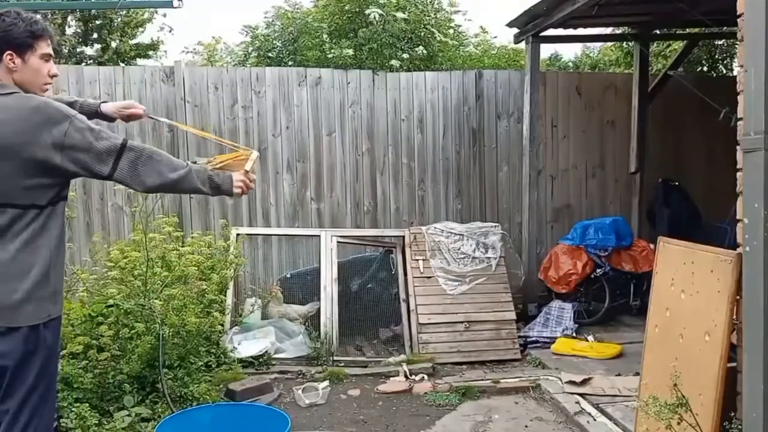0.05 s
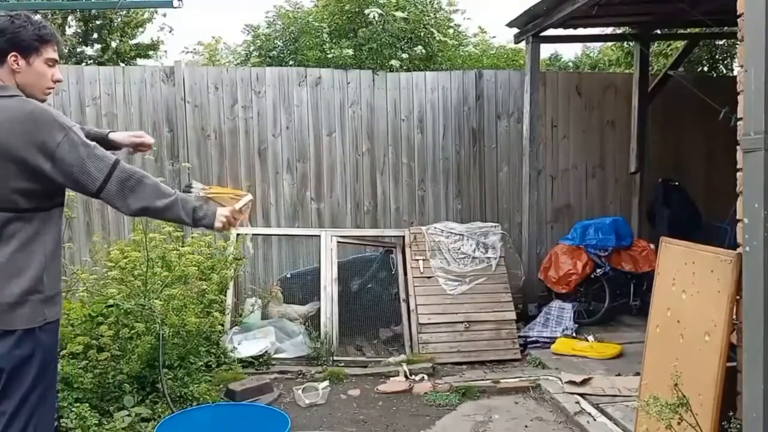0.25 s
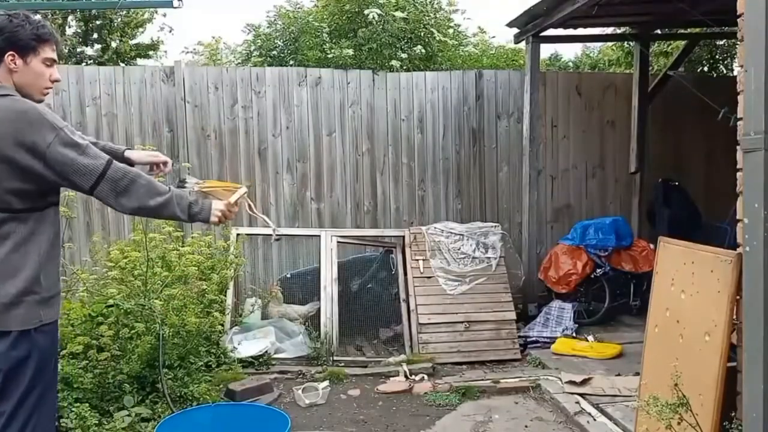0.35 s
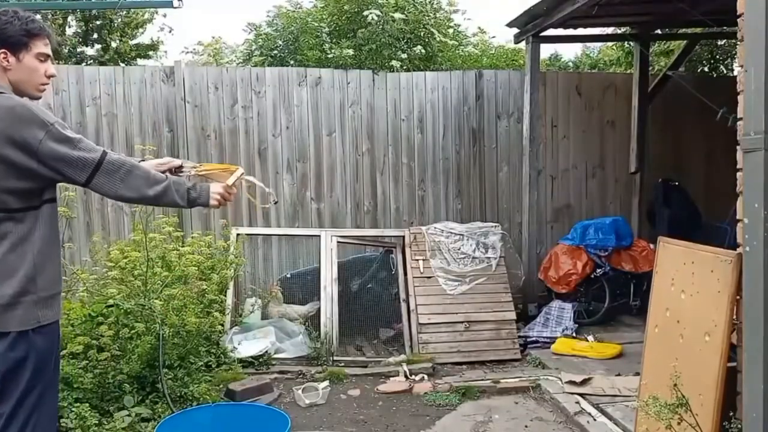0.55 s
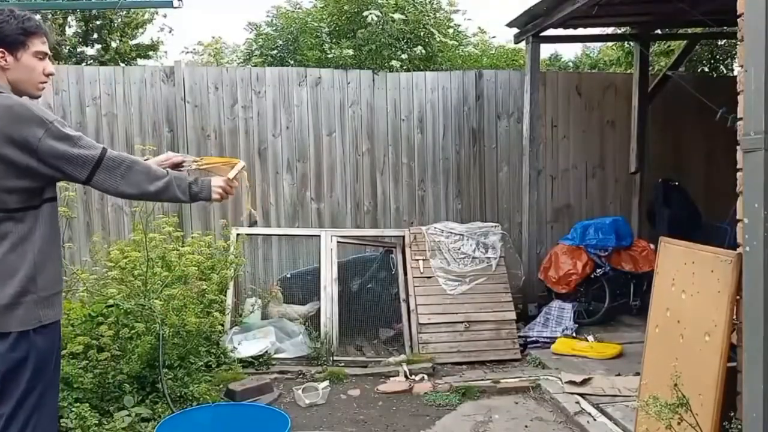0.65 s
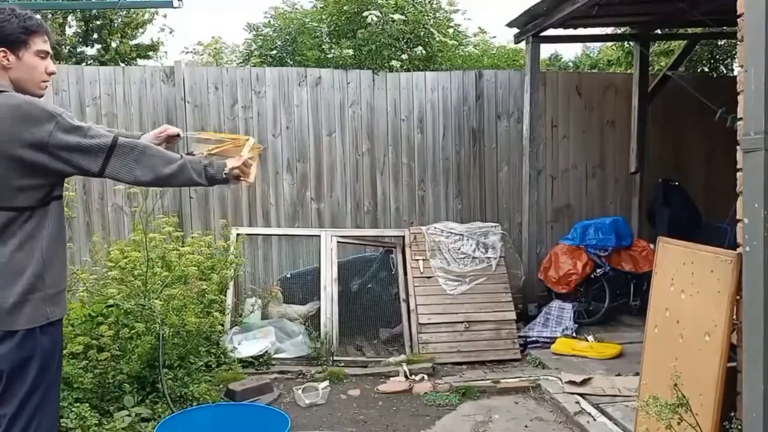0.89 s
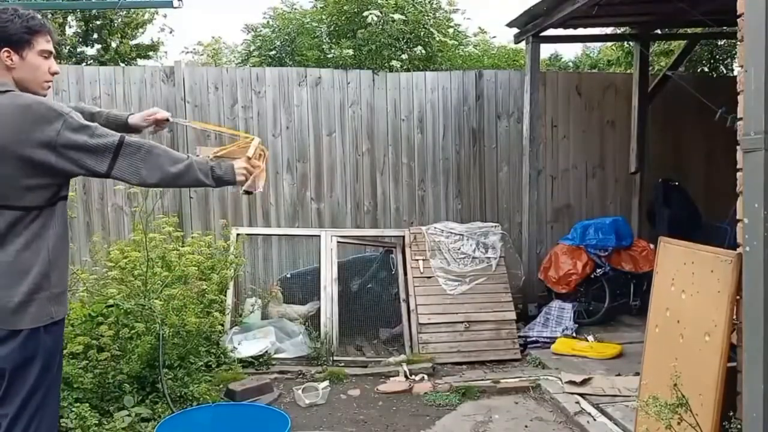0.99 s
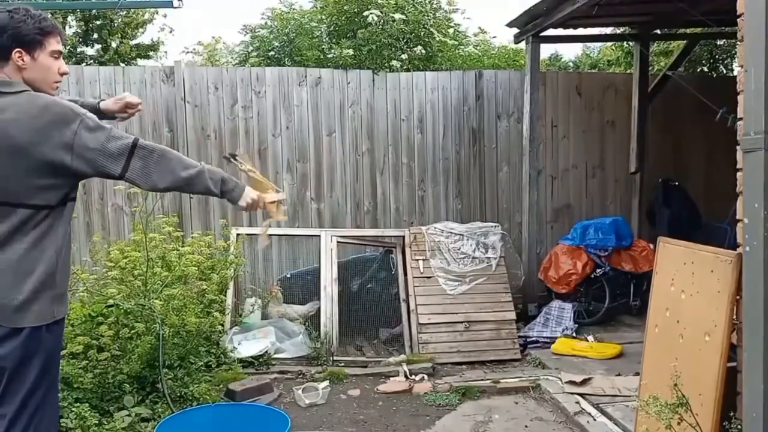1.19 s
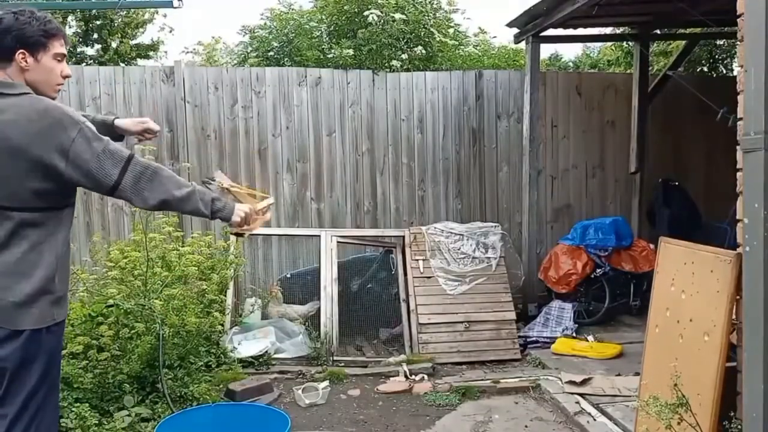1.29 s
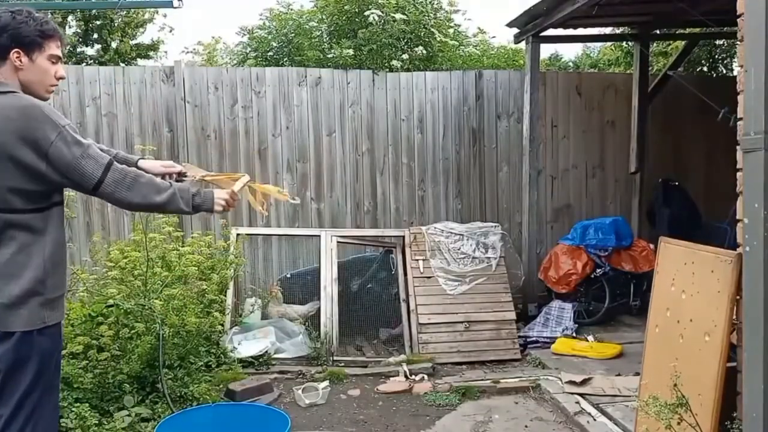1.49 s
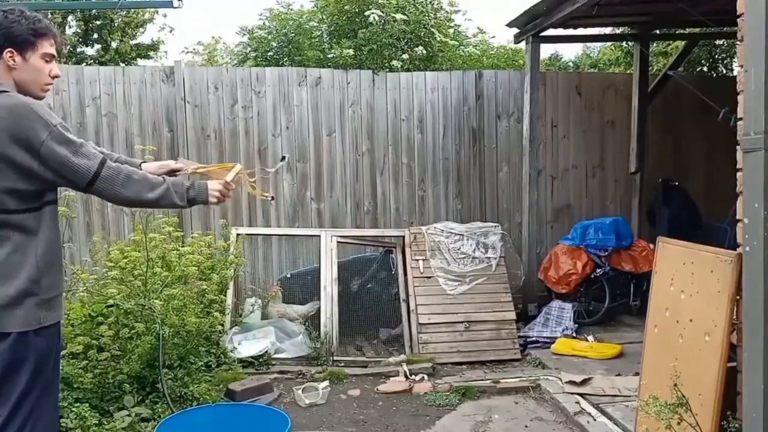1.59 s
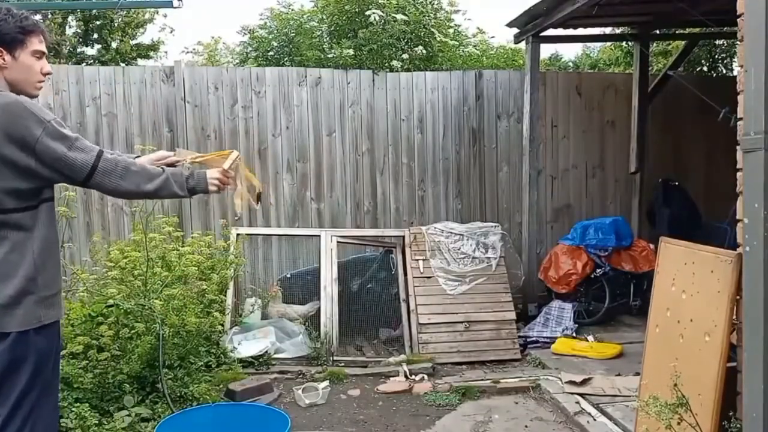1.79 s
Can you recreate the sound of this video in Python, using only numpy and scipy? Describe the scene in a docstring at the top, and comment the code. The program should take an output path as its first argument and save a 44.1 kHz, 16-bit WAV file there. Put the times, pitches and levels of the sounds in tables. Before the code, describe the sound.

A slingshot fires twice in a fenced yard, sharp snaps followed by a thwack and a clang

```python
"""A wooden slingshot is fired twice in a fenced back yard: its bands slap and crack as pressure pulses
and noise bursts, rubber and fork ring as decaying modes, and fence and shed return echoes and scatter.
Rubber swishes before each snap, as swelling noise, and loose bands and sleeve rustle. The first shot
thwacks a hollow board and drops; the second clangs on something harder, and two dull thuds follow as
the slack bands flap back. Air and leaves murmur as steady coloured noise that slowly fades."""
import sys
import numpy as np
from scipy import signal
from scipy.io import wavfile
from scipy.ndimage import uniform_filter1d

SR = 44100
rng = np.random.default_rng(int(sys.argv[2]) if len(sys.argv) > 2 else 0)


def store_pcm(level_fs):
    """Save levels as 16-bit WAV."""
    pcm = np.round(np.clip(level_fs, -1, 1) * 32767).astype(np.int16)
    wavfile.write(sys.argv[1], SR, np.atleast_2d(pcm).T)


N = 81585
TIME = np.arange(N) / SR

# edges of the noise bands: (frequency [Hz])
BAND_EDGES_HZ = np.r_[np.geomspace(22, 4400, 16), 5200, 6300, 7700, 8600, 11000, 14000, 17000]
# likeness of the two ears: (frequency [Hz], correlation [-1 to 1])
EAR_LIKENESS = [(60, 0.92), (150, 1), (300, 0.86), (550, 0.3), (1000, -0.15), (2200, -0.25), (5000, 0)]
# reverberation of the yard before scaling: (frequency [Hz], t60 [s])
YARD_T60 = [(60, 0.59), (250, 0.51), (800, 0.44), (2500, 0.57), (7000, 0.54), (15000, 0.37)]
SCATTER_GRAIN_DB, SCATTER_GRAIN_HZ = 2.2, 160   # reflections come in clumps
RING_WAVER_DB, RING_WAVER_HZ = 1.4, 35   # reflections make every ring waver
LEAD_S = 0.00019   # the slingshot is to the left

# spectrum of air and leaves: (frequency [Hz], density [dB per Hz])
AIR_COLOUR = [(25, 0.5), (55, -11), (115, 9), (180, 1), (400, -2.5), (800, -4.5), (1200, 3.5), (2400, -6),
              (4500, -18.5), (5700, -17.5), (7000, -15), (8200, -61.5), (9800, -54), (15000, -56)]
AIR_DB, AIR_FADE_DB_PER_S = -49, -2

# dull bumps of air and handling: (time [s], level [dB], width [s])
BUMPS = [(.12, -44, 0.052), (.54, -46.5, 0.1), (.61, -52, .022), (.72, -60, 0.035), (.94, -55.5, 0.035)]
# spectrum of the bumps: (frequency [Hz], density [dB per Hz])
BUMP_COLOUR = [(30, -41), (70, -5.5), (125, 13), (190, -33), (500, -9), (2000, -61)]
# small ticks, the second and third being sharp echoes of the first snap: (time [s], level [dB])
TICKS = [(0.1214, -32.5), (0.236, -26), (0.2564, -23), (1.183, -31), (1.219, -27), (1.476, -31.5)]
# rubber slides from the fingers and rushes forward: (time [s], level [dB], width [s])
SWISHES = [(.127, -69, 0.0056), (.162, -40, .018), (1.19, -43.5, 0.0046), (1.222, -33, 0.01),
           (1.264, -37, 0.011)]
# spectrum of the swishes: (frequency [Hz], density [dB per Hz])
SWISH_COLOUR = [(150, -13), (370, -3), (900, -2.5), (1600, 0), (2600, 2), (3800, -9), (5700, -11.5),
                (7000, -5), (8200, -16), (10000, -23.5), (15000, -25)]
# loose bands and sleeve rustle: (time [s], level [dB], width [s])
RUSTLES = [(.51, -41.5, 0.037), (.622, -43.5, 0.014), (.668, -37.5, 0.024), (.725, -38.5, 0.011),
           (.845, -47, 0.026), (.93, -48, 0.025), (1.05, -53.5, 0.15), (1.49, -50, 0.038)]
# spectrum of the rustles: (frequency [Hz], density [dB per Hz])
RUSTLE_COLOUR = [(100, -2.5), (400, 5.5), (1200, 5), (2700, 3), (4500, -12), (5700, -11), (7000, -12.5),
                 (8200, -47), (9800, -48), (15000, -50.5)]
FRICTION_GRAIN_DB, FRICTION_GRAIN_HZ = 2.5, 110

# the bands snap: (time [s], slap level [dB], slap width [s], crack level [dB], yard level [dB],
# yard tilt [dB per octave], yard low cut [Hz], twang level [dB], fork level [dB])
SNAPS = [(0.2207, -5, 0.0003, -7, -16, -1.08, 259, -3.5, 1.5),
         (1.284, -2.5, 0.00043, -7.5, -20, -0.33, 50, 0.5, -7)]
CRACK_DECAY_S, CRACK_LOW_HZ, CRACK_DULL_HZ, CRACK_TOP_HZ = 0.0023, 850, 2700, 7700
CRACK_EDGE_DB = -20
SECOND_SLAP_S, SECOND_SLAP_DB = 0.00236, -5   # the pouch follows the bands
# hard echoes of the snap: (delay [s], level [dB], left lead [s])
ECHOES = [(.0085, -9, .00005), (.0182, -9, 0), (0.036, -11, -.0001), (.049, -4, .00005)]
ECHO_CUT_HZ = 1800
# spectrum of the snap scattered by the yard: (frequency [Hz], density [dB per Hz])
SNAP_COLOUR = [(35, -32.5), (70, -3.5), (130, 4.5), (180, -16.5), (300, -3), (520, 4), (1000, -3),
               (2500, -10.5), (4700, -21.5), (5700, -27), (7000, -18.5), (8200, -36), (9800, -47.5),
               (15000, -55)]
SNAP_RISE_S, SNAP_HOLD_S, SNAP_T60_SCALE = 0.0042, 0.056, 0.68
# modes of the slack rubber: (frequency [Hz], level [dB], t60 [s])
TWANG_MODES = [(134, -16, 0.37), (225, -19, 0.33)]
# modes of the wooden fork: (frequency [Hz], level [dB], t60 [s])
FORK_MODES = [(368.7, -22, 0.35), (430.5, -14.5, 0.14), (565, -23.5, .22), (698, -23, 0.17),
              (944, -28.5, .28)]
# the slack bands flap back and twang again: (time [s], level [dB])
FLAPS = [(1.401, 2.5), (1.437, -5.5)]
# modes of the flapping bands: (frequency [Hz], level [dB], t60 [s])
FLAP_MODES = [(222, -18, 0.16), (250, -27, .12), (288, -25, 0.14)]

# a thwack on the hollow board, then two dull thuds as the slack bands flap back, almost without ring:
# (time [s], thump level [dB], thump width [s], scatter level [dB], tilt [dB per octave],
# low cut [Hz], t60 scale [ratio], ring level [dB])
THUMPS = [(0.351, -3, 0.00063, -13.5, 0, 107, 0.64, 1.5), (1.4, -15.5, 0.0008, -20.5, -4.5, 150, 0.46, -29),
          (1.4399, -20.5, 0.00045, -28, -6.5, 190, 0.61, -49)]
# spectrum of the scattered thumps and drops: (frequency [Hz], density [dB per Hz])
KNOCK_COLOUR = [(40, -44), (80, 3), (140, -4.5), (250, -1.5), (450, -1.5), (780, -0.5), (1150, -7),
                (2300, -12.5), (4000, -27), (5700, -35.5), (7000, -30.5), (8200, -46.5), (9800, -52),
                (15000, -67)]
KNOCK_LEAD_S, KNOCK_RISE_S = 0.0054, 0.0069   # the scatter starts ahead of the thump
# modes of the hollow board: (frequency [Hz], level [dB], t60 [s])
BOARD_MODES = [(513, -19, 0.26), (604, -27, 0.42), (744, -14, 0.36), (777, -14, 0.33), (805, -22, .26),
               (829, -16, 0.29), (857, -22, .22), (2290, -22, .08)]
BOARD_DELAY_S = 0.011

# the spent shot drops and bounces: (time [s], ring level [dB], contact cut [Hz], scatter level [dB])
DROPS = [(.6375, -23.5, 1500, -36), (.696, -21.5, 430, -44), (.745, -32, 400, -50)]
# modes of the drop: (frequency [Hz], level [dB], t60 [s])
DROP_MODES = [(255, -17, .2), (377, -7, .14), (440, -7, .06), (502, -8, .11), (571, -10, .12),
              (790, -6, .15), (861, -4, .15), (945, -3, .12), (1050, -10, .13)]
DROP_LOW_HZ = 370

# the hard hit: (time [s], tick level [dB], scatter level [dB], ring level [dB])
CLANGS = [(1.3145, -5, -30, -10), (1.329, -13, -25, -3.5), (1.3535, -17, -32, -6.5)]
# spectrum of the scattered clang: (frequency [Hz], density [dB per Hz])
CLANG_COLOUR = [(200, -18), (700, -35), (1200, 6.5), (2200, 15), (3100, -2.5), (4300, -44), (5700, -32),
                (7000, -40), (8200, -17.5), (9800, -51), (15000, -53)]
# modes of the struck object: (frequency [Hz], level [dB], t60 [s])
CLANG_MODES = [(1171, -14, 0.2), (1507, -25, 0.15), (1720, -20, .16), (1933, -25, .2), (2020, -19.5, 0.24),
               (2055, -16, 0.29), (2200, -23, .24), (2275, -21, 0.18), (2412, -24, .15), (2780, -23, 0.11)]
CLANG_RISE_S, CLANG_T60_SCALE = 0.0033, 0.41
CLANG_LEAD_S, CLANG_TICK_TOP_HZ = 0.00014, 3520


def from_db(db):
    """Amplitude ratio: 20 dB is a factor of ten."""
    return 10 ** (np.asarray(db) / 20)


def at_hz(points, hz):
    """Interpolation on a logarithmic frequency axis."""
    table_hz, values = np.array(points).T
    return np.interp(np.log(hz), np.log(table_hz), values)


def filtered(x, hz, kind, order=2):
    """Butterworth filtering: a maximally flat passband."""
    sos = signal.butter(order, hz, kind, fs=SR, output="sos")
    return signal.sosfilt(sos, x + 1e-18)


def delayed(x, s):
    """Propagation delay: the same waveform, later."""
    return np.interp(TIME - s, TIME, x, left=0)


def placed(x, lead_s):
    """Interaural time difference: the left ear leads."""
    return np.array([x, delayed(x, lead_s)])


def clumps(depth_db, hz):
    """Amplitude modulation: a gain of rms 1 flickers at random below a cutoff."""
    flicker = filtered(rng.standard_normal(N), hz, "low")
    gain = from_db(depth_db * flicker / flicker.std())
    return gain / np.sqrt(np.mean(gain ** 2))


def noise_bands():
    """Interaural coherence: bands of even noise, alike in the bass and nearly unrelated in the treble."""
    bands = []
    for low, high in zip(BAND_EDGES_HZ, BAND_EDGES_HZ[1:]):
        pair = filtered(rng.standard_normal((2, N + SR // 2)), [low, high], "band", order=4)
        running_rms = np.sqrt(uniform_filter1d(pair ** 2, size=1300) + 1e-18)
        middle, side = (pair / running_rms)[:, -N:]
        alike = np.clip(at_hz(EAR_LIKENESS, np.sqrt(low * high)), -.99, .99)
        opposed = side * [[1], [-1]]
        bands.append(np.sqrt((1 + alike) / 2) * middle + np.sqrt((1 - alike) / 2) * opposed)
    return bands


def coloured(bands, colour, tilt_db=0, age=None, t60_scale=1):
    """Spectral density: noise of rms 1; given an age, each band decays at its reverberation rate."""
    hz = np.sqrt(BAND_EDGES_HZ[1:] * BAND_EDGES_HZ[:-1])
    density = from_db(at_hz(colour, hz) + tilt_db * np.log2(hz))
    gains = density * np.sqrt(np.diff(BAND_EDGES_HZ))
    gains = gains / np.linalg.norm(gains)
    rates = np.log(1000) / (at_hz(YARD_T60, hz) * t60_scale)
    out = 0
    for band, gain, rate in zip(bands, gains, rates):
        decay = 1 if age is None else np.exp(-rate * age)
        out = out + band * gain * decay
    return out


def scatter(bands, s, colour, rise_s, hold_s, t60_scale, tilt_db=0):
    """Diffuse reverberation: dense reflections of a blow build up, hold and die."""
    age = np.maximum(TIME - s - rise_s - hold_s, 0)
    rise = np.clip((TIME - s) / rise_s, 0, 1)
    grain = clumps(SCATTER_GRAIN_DB, SCATTER_GRAIN_HZ)
    return rise * grain * coloured(bands, colour, tilt_db, age, t60_scale)


def slap(s, width_s):
    """Impulsive pressure: one swing, down then up, of height 1."""
    u = (TIME - s) / width_s - 2
    return u * np.exp((1 - u ** 2) / 2)


def crack(s, top_hz):
    """Broadband transient: milliseconds of decaying crackle, with a faint edge of high treble."""
    age = np.maximum(TIME - s, 0)
    crackle = rng.choice([-1, 1], N) * (age > 0) * np.exp(-age / CRACK_DECAY_S)
    burst = filtered(crackle, [CRACK_LOW_HZ, CRACK_DULL_HZ], "band", order=1)
    return 2 * (filtered(burst, top_hz, "low", order=8) + from_db(CRACK_EDGE_DB) * burst)


def ring(s, modes):
    """Modal vibration: decaying sines waver singly; the higher ones reach the ears out of step."""
    age, out = np.maximum(TIME - s, 0), 0
    for hz, db, t60 in modes:
        apart = np.arccos(at_hz(EAR_LIKENESS, hz)) * np.array([[.5], [-.5]])
        onset = np.minimum(age * hz / 2, 1)   # two cycles
        level = from_db(db - 60 * age / t60) * onset * clumps(RING_WAVER_DB, RING_WAVER_HZ)
        out = out + level * np.sin(2 * np.pi * hz * age + apart)
    return out


def swells(rows):
    """Addition of powers: Gaussian rises and falls of level."""
    return np.sqrt(sum(from_db(db) ** 2 * np.exp(-((TIME - s) / width) ** 2 / 2)
                       for s, db, width in rows))


def air(bands):
    """Stationary noise: air and leaves murmur in one colour, slowly fading."""
    return from_db(AIR_DB + AIR_FADE_DB_PER_S * TIME) * coloured(bands, AIR_COLOUR)


def handling(bands):
    """Friction noise: rubber and sleeve rub grainily, with small ticks and dull bumps."""
    bumps = swells(BUMPS) * coloured(bands, BUMP_COLOUR)
    ticks = sum(from_db(db) * crack(s, CRACK_TOP_HZ) for s, db in TICKS)
    swishes = swells(SWISHES) * coloured(bands, SWISH_COLOUR)
    rustles = swells(RUSTLES) * coloured(bands, RUSTLE_COLOUR)
    friction = (swishes + rustles) * clumps(FRICTION_GRAIN_DB, FRICTION_GRAIN_HZ)
    return bumps + placed(ticks, LEAD_S) + friction


def snaps(bands):
    """Impulse and response: bands and pouch slap and crack, rubber and fork ring, the yard answers."""
    out = sum(from_db(db) * ring(s, FLAP_MODES) for s, db in FLAPS)
    for s, db, width_s, crack_db, yard_db, tilt_db, low_hz, twang_db, fork_db in SNAPS:
        band_slap = slap(s - width_s, width_s)
        pouch_slap = -from_db(SECOND_SLAP_DB) * slap(s + SECOND_SLAP_S, width_s)
        direct = from_db(db) * (band_slap + pouch_slap)
        bright = from_db(crack_db) * crack(s - width_s, CRACK_TOP_HZ)
        out = out + placed(direct + bright, LEAD_S)
        out = out + from_db(twang_db) * ring(s, TWANG_MODES) + from_db(fork_db) * ring(s, FORK_MODES)
        dull = filtered(direct, ECHO_CUT_HZ, "low", order=1)
        for delay_s, echo_db, lead_s in ECHOES:
            out = out + from_db(echo_db) * placed(delayed(dull, delay_s), lead_s)
        yard = scatter(bands, s, SNAP_COLOUR, SNAP_RISE_S, SNAP_HOLD_S, SNAP_T60_SCALE, tilt_db)
        out = out + from_db(yard_db) * filtered(yard, low_hz, "high", order=1)
    return out


def thumps(bands):
    """Pulse and resonance: a shot thwacks a hollow board, which rings; later two dull thuds barely do."""
    out = 0
    for s, db, width_s, scatter_db, tilt_db, low_hz, t60_scale, ring_db in THUMPS:
        # shifting the bands gives every thump its own noise
        own = [np.roll(band, int(rng.integers(SR // 50, SR // 4)), axis=1) for band in bands]
        yard = scatter(own, s - KNOCK_LEAD_S, KNOCK_COLOUR, KNOCK_RISE_S, 0.013, t60_scale, tilt_db)
        board = ring(s + BOARD_DELAY_S, BOARD_MODES)
        body = from_db(scatter_db) * yard + from_db(ring_db) * board
        thump = from_db(db) * slap(s - width_s, width_s)
        out = out + placed(thump, LEAD_S) + filtered(body, low_hz, "high")
    return out


def drops(bands):
    """Contact filtering: the spent shot lands with a small knock; its bounces are duller."""
    out = 0
    for s, ring_db, cut_hz, scatter_db in DROPS:
        knock = filtered(ring(s, DROP_MODES), cut_hz, "low")
        yard = scatter(bands, s, KNOCK_COLOUR, KNOCK_RISE_S, 0.0073, 1.28)
        out = out + from_db(ring_db) * knock + from_db(scatter_db) * filtered(yard, DROP_LOW_HZ, "high")
    return out


def clangs(bands):
    """Impact excitation: a shot ticks on something hard and sets its modes ringing."""
    out = 0
    for s, tick_db, scatter_db, ring_db in CLANGS:
        tick = placed(crack(s, CLANG_TICK_TOP_HZ), CLANG_LEAD_S)
        yard = scatter(bands, s, CLANG_COLOUR, CLANG_RISE_S, 0.015, CLANG_T60_SCALE)
        out = out + from_db(tick_db) * tick + from_db(scatter_db) * yard
        out = out + from_db(ring_db) * ring(s, CLANG_MODES)
    return out


def scene():
    """Superposition: two shots over the murmur of the yard."""
    near, far, other = noise_bands(), noise_bands(), noise_bands()
    return air(far) + handling(other) + snaps(near) + thumps(near) + drops(far) + clangs(far)


def record(dry):
    """Band limiting and saturation: deep bass and top are cut, the highest peaks are rounded."""
    rounded = .99 * np.tanh(filtered(dry, 50, "high") / .99)
    top_cut = signal.cheby2(12, 70, 16700, fs=SR, output="sos")   # 70 dB down from 16700 Hz
    return signal.sosfilt(top_cut, rounded)


dry = scene()
out = record(dry)
store_pcm(out)
```